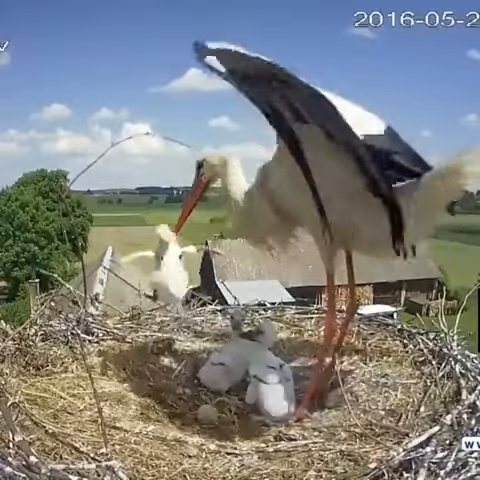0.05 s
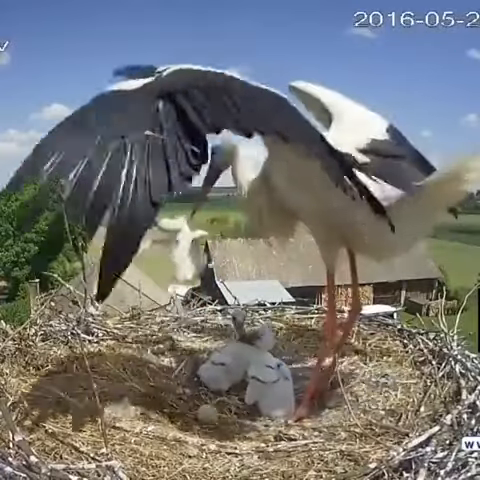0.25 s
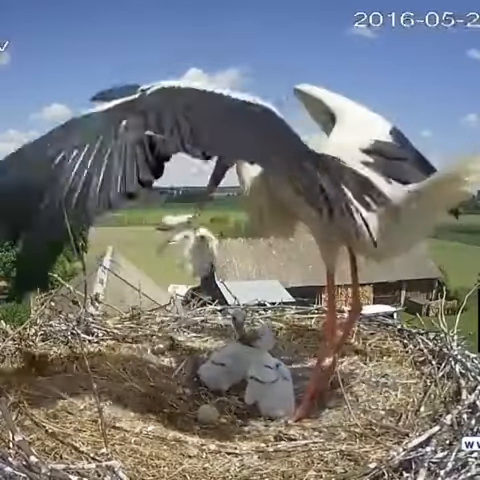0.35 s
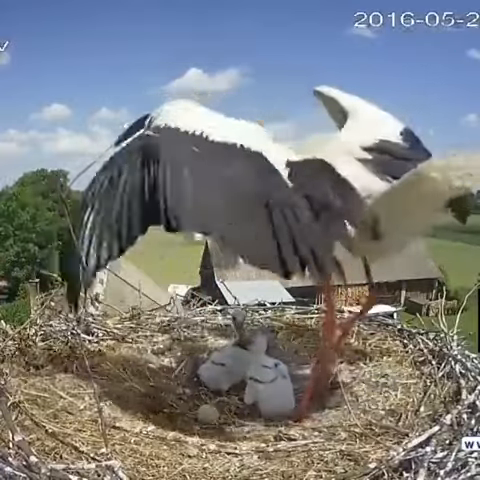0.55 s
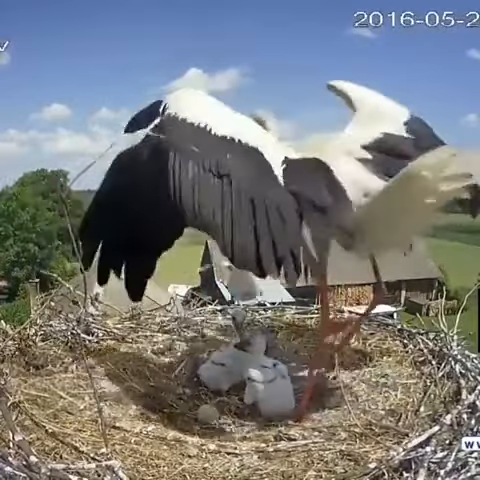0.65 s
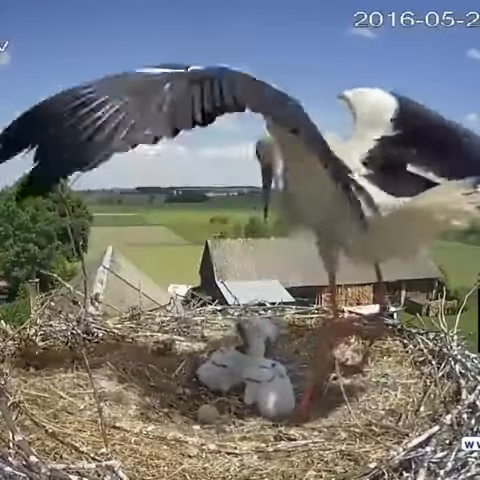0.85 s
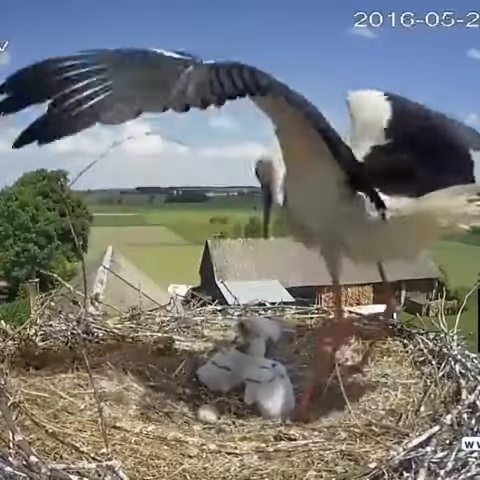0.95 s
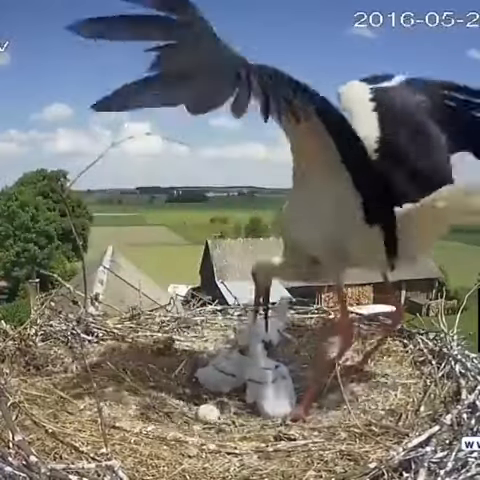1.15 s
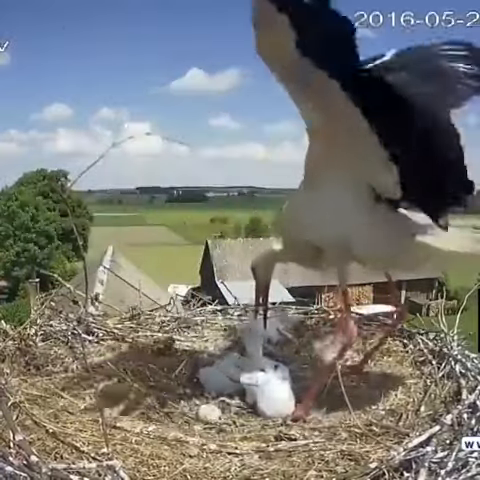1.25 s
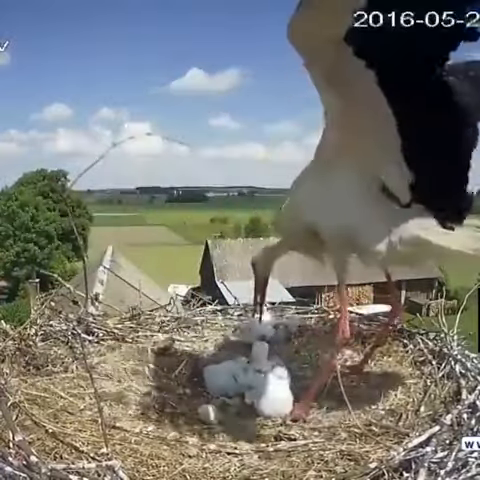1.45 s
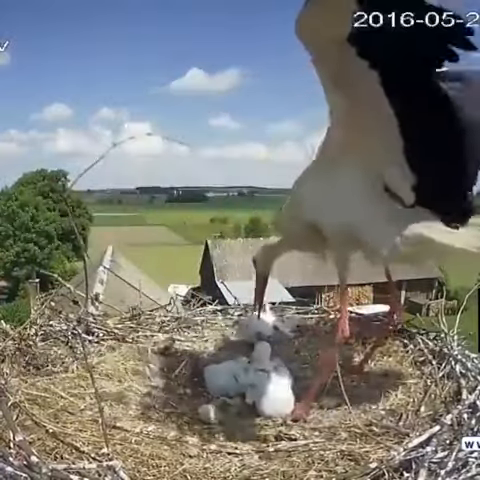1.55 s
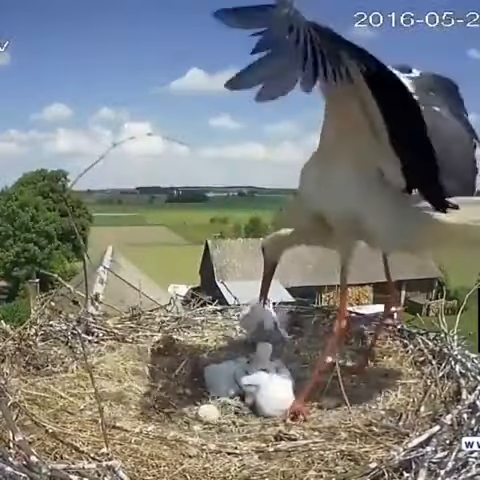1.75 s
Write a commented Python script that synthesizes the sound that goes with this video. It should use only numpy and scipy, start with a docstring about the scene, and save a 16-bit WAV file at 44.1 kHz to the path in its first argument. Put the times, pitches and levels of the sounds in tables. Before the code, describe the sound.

A stork chick's thin cry turns to hoarse rasps as an adult flaps over it.

```python
"""A stork chick gives a thin, meowing cry that breaks into a squeal and hoarse rasps.
The meow is a voice with overtones; the rasps are pulses and noise ringing in the throat.
The parent flaps over the nest: its wings buffet the microphone and dry sticks tick underfoot.
A small bird chirps far off over faint outdoor air."""
import sys
import numpy as np
from scipy import signal
from scipy.fft import rfft, irfft
from scipy.io import wavfile
from scipy.ndimage import uniform_filter1d

SR = 44100
rng = np.random.default_rng(int(sys.argv[2]) if len(sys.argv) > 2 else 0)


def generate_wav(signal):
    """Clip the signal to [-1, 1] and save it as 16-bit WAV at the path in sys.argv[1]."""
    frames = np.transpose(np.atleast_2d(signal))
    scaled = np.clip(frames, -1, 1) * 32767
    pcm = np.round(scaled).astype(np.int16)
    wavfile.write(sys.argv[1], SR, pcm)


N = 79380
TIME = np.arange(N) / SR

# The path of the meow: time_s, pitch_hz, level_db
MEOW_PATH = [(0, 742.6, -53), (0.041, 707, -52.5), (0.087, 675, -54.5), (0.134, 697, -53),
             (0.188, 707, -52), (0.239, 668, -59.5), (0.269, 650.5, -57), (0.369, 646, -53.5),
             (0.421, 620, -56.5), (.44, 606.4, -49.5)]
# How the throat shapes the overtones: frequency_hz, gain_db
THROAT_COLOUR = [(700, -6), (1400, -2.5), (2100, 3), (2800, -3.5), (3500, -1.5), (4200, -32), (5200, -6.5),
                 (7000, -58), (12000, -47)]
# The husky noise in the voice: frequency_hz, gain_db
HUSK_COLOUR = [(100, -10), (450, -9.5), (950, 0), (1600, -9.5), (2300, 1), (3400, -4), (4400, -25),
               (7000, -46), (13000, -42)]

def meow():
    """A slightly husky cry that thins towards the throat's main resonance as it goes on."""
    resonance_hz, thinning_db_per_s, husk_db = 1900, 42, -3.5
    times, pitches, levels = np.transpose(MEOW_PATH)
    pitch_hz = np.interp(TIME, times, pitches) * (1 + 0.0057 * wobble(165))
    voice = np.zeros(N)
    for harmonic in range(1, 15):
        hz = harmonic * pitch_hz
        octaves_away = np.minimum(abs(np.log2(hz / resonance_hz)), 1)
        gain_db = db_at(THROAT_COLOUR, hz) - thinning_db_per_s * TIME * octaves_away
        voice += amp(gain_db) * np.cos(harmonic * phase_of(pitch_hz))
    husk = amp(husk_db) * colour(noise(), HUSK_COLOUR)
    return amp(np.interp(TIME, times, levels, right=-120)) * (voice + husk)


# The path of the squeal: time_s, pitch_hz, level_db
SQUEAL_PATH = [(0.233, 3080, -49), (0.25, 4030, -43), (.254, 4260, -48), (0.264, 4746, -53),
               (.271, 3816, -42), (.276, 3590, -36.5), (0.281, 4120, -49), (0.289, 3100, -49.5),
               (0.3, 3320, -32.5), (0.31, 4154, -51), (0.314, 3250, -38), (0.324, 3645, -49.5),
               (.329, 2800, -41.5), (0.343, 3233, -64)]

def squeal():
    """The voice breaks into a high, lurching whistle with a faint octave above it."""
    times, pitches, levels = np.transpose(SQUEAL_PATH)
    phase = phase_of(np.interp(TIME, times, pitches) * (1 + 0.0173 * wobble(710)))
    tone = unit(np.sin(phase) + amp(-36) * np.sin(2 * phase))
    return amp(np.interp(TIME, times, levels, left=-120, right=-120)) * tone


# The hiss of a rasp: frequency_hz, gain_db
HISS_COLOUR = [(500, -42), (2500, -19), (4500, 4), (5800, 6.5), (7000, 2), (8300, -11), (10000, -3),
               (12500, -14)]
# The hiss that spreads left and right, in the rasps and the air: frequency_hz, gain_db
SIDE_COLOUR = [(20, -70), (3500, -80), (4300, -9.5), (5500, 1), (7200, -8), (8300, -6.5), (11000, -6),
               (13000, -27.5)]
# The chick's rasps: start_s, length_s, rise_s, level_db, first_hz, last_hz, width_hz,
# upper_hz, upper_db, hiss_db, side_db, pulses_per_s, noise_share (0 to 1)
CHICK_RASPS = [ (0.195, 0.055, 0.0045, -50.5, 1090, 1250, 650, 3050, 0, 1, -9, 260, 0.95),
               (0.217, 0.098, 0.032, -57, 1020, 1140, 1060, 3900, 5.5, 9.5, 3.5, 330, 1),
               (0.276, 0.076, 0.0088, -43, 1430, 1200, 1200, 2060, -15, -15, -23, 300, 0.84),
               (.332, 0.047, 0.0016, -46, 1170, 1510, 980, 2600, -12, -11, -14, 220, 0.63),
               (0.367, 0.076, 0.05, -64, 1450, 1480, 1500, 4850, 14.5, 13.5, 5, 350, 0.74),
               (.426, 0.067, 0.0059, -46, 1390, 1200, 920, 4100, -11.5, -10.5, -12.5, 330, 0.48),
               (.470, .046, .005, -47.5, 1253, 895, 920, 3780, -11.5, -16.5, -14, 175, 0.31),
               (0.582, .030, 0.0052, -56.5, 1120, 1120, 300, 2840, 2, -3.5, -23, 300, 1),
               (0.604, 0.089, 0.0081, -69.5, 1140, 1080, 500, 3550, 12, 7, 6, 300, 1),
               (.640, 0.064, 0.019, -48, 1040, 1300, 390, 3200, 0, -9.5, -41, 230, 0.62),
               (0.861, 0.061, 0.017, -67, 905, 804, 1180, 3700, 8.5, 7, -4.5, 200, 1),
               (1.129, 0.099, 0.0042, -55.5, 1160, 800, 940, 3110, 6.5, -9, -14, 290, 0.94),
               (1.198, 0.071, 0.029, -56, 730, 640, 1050, 2720, 5, -4.5, -9, 205, 0.3),
               (1.266, 0.13, 0.023, -55.5, 2210, 1970, 1200, 4200, -1, 6.5, -11, 330, 1),
               (1.291, .045, 0.0089, -41.5, 1830, 1710, 675, 3110, -2.5, -7.5, -35, 330, 0.47),
               (1.311, .068, 0.011, -36.5, 1880, 1780, 720, 3410, -2.5, -22, -24, 360, 0.96),
               (1.371, 0.08, 0.0047, -55, 1710, 1830, 720, 3720, -0.5, -2, -3.5, 300, 0.97),
               (1.444, 0.051, 0.032, -48.5, 1240, 1510, 870, 2780, -1, -3.5, -34, 250, 1),
               (1.489, 0.046, 0.0085, -51, 1340, 1120, 1020, 2600, -0.5, -2.5, -47, 240, 0.68)]

def rasp(length_s, rise_s, level_db, first_hz, last_hz, width_hz,
         upper_hz, upper_db, hiss_db, side_db, pulses_per_s, noise_share):
    """Uneven, slowing throat pulses and noise ring two resonances under a hiss; gives (mid, side)."""
    t = np.arange(0, length_s, 1 / SR)
    progress, n = t / length_s, len(t)
    slowing, jitter = 0.25, 0.15
    cycles = np.cumsum(pulses_per_s * (1 + slowing * (0.5 - progress) + jitter * wobble(200)[:n])) / SR
    pulses = np.diff(np.floor(cycles), prepend=0)
    puffs = (0.55 + np.exp(-(cycles % 1) / 0.3)) * noise()[:n]  # noise surges with each pulse
    drive = np.sqrt(1 - noise_share) * unit(pulses) + np.sqrt(noise_share) * unit(puffs)
    lower = resonate(drive, first_hz + (last_hz - first_hz) * progress, width_hz)
    upper = amp(upper_db) * resonate(drive, upper_hz, width_hz=1100)
    low_cut_hz = np.clip(0.36 * (first_hz + last_hz - width_hz), 100, 1200)
    low_cut = signal.butter(4, low_cut_hz, "highpass", fs=SR, output="sos")
    throat = signal.sosfilt(low_cut, lower + upper)
    fade_in = np.minimum(t / rise_s, 1)
    fade_out = np.minimum((1 - progress) / 0.75, 1) ** 0.51  # over the last three quarters
    swell = np.sin(np.pi * progress) ** 0.93
    mid = fade_in * fade_out * throat + swell * amp(hiss_db) * colour(drive, HISS_COLOUR)
    side = swell * amp(side_db) * colour(noise()[:n], SIDE_COLOUR)
    return amp(level_db) * mid, amp(level_db) * side


# Whistled notes in the rasps: start_s, length_s, first_hz, last_hz, level_db
WHISTLE_NOTES = [(.2, 0.019, 880, 830, -53), (0.282, 0.011, 2130, 2200, -43.5),
                 (.349, .014, 1910, 2066, -42.5), (0.353, 0.021, 1100, 1290, -49),
                 (0.428, 0.045, 1947, 1500, -42), (0.584, 0.021, 1111, 1127, -55),
                 (0.6, 0.018, 3380, 3610, -47.5), (0.668, 0.0235, 1392, 1344, -49),
                 (1.125, 0.031, 2700, 2556, -56), (1.203, 0.058, 5930, 6110, -58.5),
                 (1.48, 0.013, 1610, 1400, -49)]

def whistles():
    """Short, sliding whistles cut through the chick's rasps."""
    out = np.zeros(N)
    for start_s, length_s, first_hz, last_hz, level_db in WHISTLE_NOTES:
        progress = np.arange(0, length_s, 1 / SR) / length_s
        slide_hz = first_hz + (last_hz - first_hz) * progress
        pitch_hz = slide_hz * (1 + 0.02 * wobble(280)[:len(progress)])
        add(out, start_s, amp(level_db) * np.sin(np.pi * progress) * unit(np.sin(phase_of(pitch_hz))))
    return out


# Puffs of air from the wings: centre_s, width_s, level_db
WING_PUFFS = [(.285, 0.0046, -59), (0.509, 0.0034, -43), (0.606, 0.0017, -31.5), (0.656, 0.0022, -34.5),
              (0.663, 0.0035, -32), (.718, 0.0016, -30), (.731, 0.002, -27), (1.008, 0.0017, -25),
              (1.1, 0.0018, -22), (1.115, 0.0011, -28), (1.151, 0.0017, -22.5), (1.163, 0.0032, -55),
              (1.242, 0.0017, -23), (1.256, 0.002, -23.5), (1.313, 0.0015, -30), (1.51, 0.0021, -40),
              (1.577, 0.0021, -27.5), (1.757, 0.0091, -45)]

def wing_puffs():
    """Each puff pushes, then pulls at the microphone."""
    out = np.zeros(N)
    for centre_s, width_s, level_db in WING_PUFFS:
        offset = (TIME - centre_s) / width_s
        out -= amp(level_db) * offset * np.exp((1 - offset ** 2) / 2)
    return out


# The strength of the swirling air: time_s, level_db
SWIRL_LEVELS = [(0, -58.5), (.12, -92), (.49, -69.5), (.53, -63.5), (.69, -52.5), (.745, -39),
                (0.792, -50.5), (.94, -48.5), (1.03, -38.5), (1.08, -44.5), (1.16, -35), (1.23, -35.5),
                (1.31, -37.5), (1.35, -40), (1.45, -39.5), (1.538, -51.5), (1.598, -37), (1.68, -52),
                (1.8, -59)]
# Its low rumble: frequency_hz, gain_db
RUMBLE_COLOUR = [(20, -3), (50, 0), (90, 5), (140, 5), (200, -8), (260, -21), (330, -26), (450, -42.5),
                 (1000, -44), (3000, -68)]
# The brighter rush of a strong gust: frequency_hz, gain_db
RUSH_COLOUR = [(100, -7), (240, -8.5), (320, 1.5), (420, -9.5), (700, -22.5), (1200, -38), (3000, -70)]

def wing_swirl():
    """Air swirls behind the wings, fluttering and brightening in the strongest gusts."""
    times, levels = np.transpose(SWIRL_LEVELS)
    level_db = np.interp(TIME, times, levels) + 2 * wobble(24.4)
    rumble = colour(noise(), RUMBLE_COLOUR)
    rumble /= np.sqrt(uniform_filter1d(rumble ** 2, size=2200) + 1e-6)  # even out its own swells
    rush_db = -52 + 2.35 * (level_db - levels.max())  # grows faster than the rumble
    return amp(level_db) * rumble + amp(rush_db) * colour(noise(), RUSH_COLOUR)


# Sticks ticking underfoot: start_s, level_db, ring_hz
STICK_TICKS = [(.307, -57, 4030), (0.31, -44, 3800), (0.391, -50, 5500), (.779, -65, 6040),
               (.891, -48.5, 2190), (1.042, -60.5, 1700), (1.218, -45, 2940), (1.463, -47, 2680),
               (1.596, -59.5, 2300)]

def sticks():
    """Dry twigs tick with a brief ring over a duller knock."""
    width_hz, decay_s, knock_hz, knock_db = 960, 0.0019, 990, -6
    out, t = np.zeros(N), TIME[:1000]
    for start_s, level_db, ring_hz in STICK_TICKS:
        snap = noise()[:len(t)]
        ring = resonate(snap, ring_hz, width_hz)
        knock = amp(knock_db) * resonate(snap, knock_hz, width_hz)
        add(out, start_s, 2 * amp(level_db) * np.exp(-t / decay_s) * (ring + knock))
    return out


# The far bird's chirps: start_s, top_pitch_hz, level_db
BIRD_CHIRPS = [(.795, 4790, -58.5), (.885, 4500, -59), (.95, 3975, -60.5), (1.40, 4890, -59),
               (1.583, 4750, -53.5), (1.660, 4235, -55), (1.728, 4160, -56)]

def far_bird():
    """Each chirp rises and falls in pitch; a short echo blurs it with distance."""
    chirp_s, echo_s, echo_db = 0.044, 0.25, -5
    out = np.zeros(N)
    arch = np.sin(np.pi * np.arange(0, chirp_s, 1 / SR) / chirp_s)
    for start_s, top_pitch_hz, level_db in BIRD_CHIRPS:
        pitch_hz = top_pitch_hz * (1 - 0.18 * (1 - arch ** 2) + 0.033 * wobble(670)[:len(arch)])
        add(out, start_s, amp(level_db) * arch ** 0.45 * unit(np.sin(phase_of(pitch_hz))))
    tail = noise() * amp(-60 * TIME / echo_s)
    echo = signal.fftconvolve(out, tail / np.linalg.norm(tail))[:N]
    return out + amp(echo_db) * echo


# The outdoor air: frequency_hz, gain_db
AIR_COLOUR = [(20, -4), (100, 6), (200, -2.5), (400, 5), (1000, -2.5), (2300, -2.5), (3000, 0), (3700, 2.5),
              (4800, -2), (7000, -1), (8300, -10), (10500, -11.5), (12800, -14.5)]

def air(colour_table):
    """A hiss with drifting patches that are a little louder or softer."""
    patch_db = 1.8
    hz, _, spectrum = signal.stft(noise(), SR, nperseg=512, noverlap=384)
    patches = uniform_filter1d(rng.standard_normal(spectrum.shape), size=8, axis=0)  # blur in frequency
    patches = unit(uniform_filter1d(patches, size=20, axis=1))  # blur in time
    spectrum *= amp(db_at(colour_table, hz)[:, None] + patch_db * patches)
    return unit(signal.istft(spectrum, nperseg=512, noverlap=384)[1][:N])


def amp(db):
    """Turns decibels into a number to multiply by."""
    return 10 ** (np.asarray(db) / 20)


def unit(x):
    """Scales a signal to an average strength (rms) of 1."""
    return x / np.sqrt(np.mean(x ** 2) + 1e-20)


def add(mix, start_s, sound):
    """Mixes a sound in at its start time."""
    part = mix[max(round(start_s * SR), 0):][:len(sound)]
    part += sound[:len(part)]


def db_at(colour_table, hz):
    """Looks up a gain between the rows of a colour table."""
    frequencies, gains = np.transpose(colour_table)
    return np.interp(np.log(hz + 1), np.log(frequencies + 1), gains)


def colour(x, colour_table):
    """Sets a sound's balance of low and high, at strength 1."""
    gain = amp(db_at(colour_table, np.fft.rfftfreq(len(x), 1 / SR)))
    return unit(irfft(rfft(x) * gain, len(x)))


def noise():
    """White noise."""
    return rng.standard_normal(N)


def wobble(rate_hz):
    """Random wavering, up to about the given rate."""
    keep_slow = np.exp(-(np.fft.rfftfreq(N, 1 / SR) / rate_hz) ** 2)
    return unit(irfft(rfft(noise()) * keep_slow, N))


def phase_of(hz):
    """The angle a wave has turned through as it follows a pitch."""
    return 2 * np.pi * np.cumsum(hz) / SR


def resonate(x, hz, width_hz):
    """Keeps a band around a frequency that may slide, at strength 1."""
    spin = np.exp(1j * phase_of(hz * np.ones(len(x))))
    b, a = signal.butter(2, np.clip(width_hz / 2, 10, SR / 4), fs=SR)
    return unit((spin * signal.lfilter(b, a, x / spin)).real)


def scene():
    """Everything sits in the middle; only the high hiss spreads left and right."""
    mid = meow() + squeal() + whistles() + wing_puffs() + wing_swirl() + sticks() + far_bird()
    mid += amp(-62) * air(AIR_COLOUR)
    side = amp(-77.5 + 16.5 * wobble(4.7)) * air(SIDE_COLOUR)  # faint, flickering treble
    for start_s, *settings in CHICK_RASPS:
        rasp_mid, rasp_side = rasp(*settings)
        add(mid, start_s, rasp_mid)
        add(side, start_s, rasp_side)
    return np.array([mid + side, mid - side])


def record(dry):
    """Cuts away the very highest treble."""
    cutoff_hz = 13200
    low_pass = signal.firwin(511, cutoff_hz, window=("kaiser", 9), fs=SR)
    return signal.oaconvolve(dry, low_pass[None], "same")


dry = scene()
out = record(dry)
generate_wav(out)
```